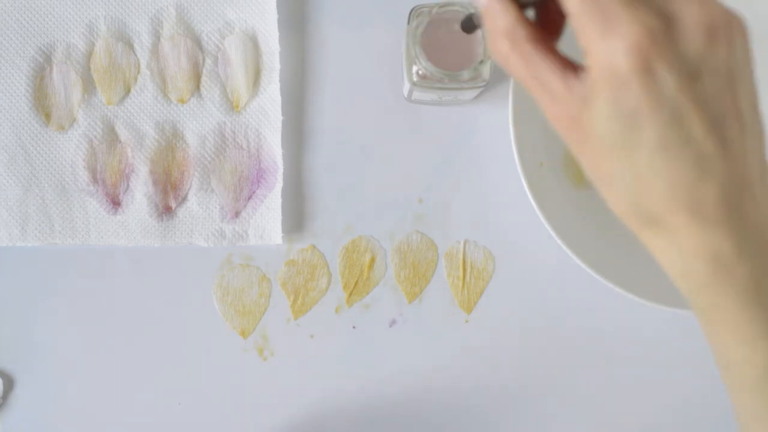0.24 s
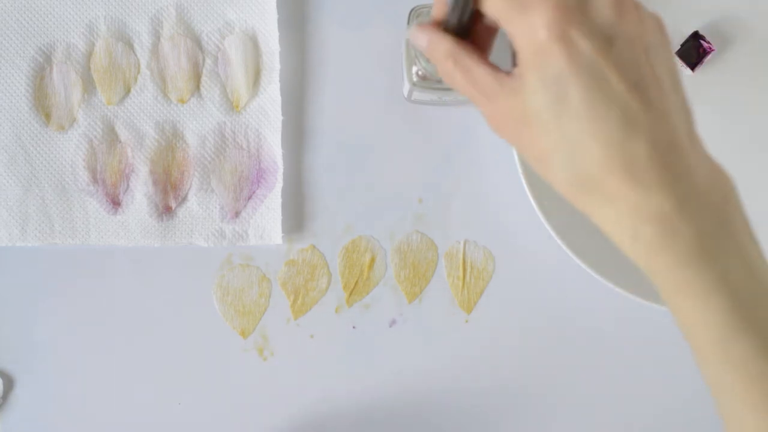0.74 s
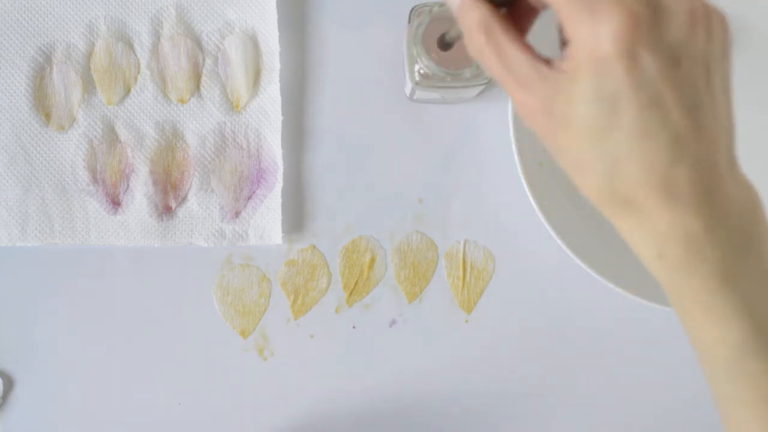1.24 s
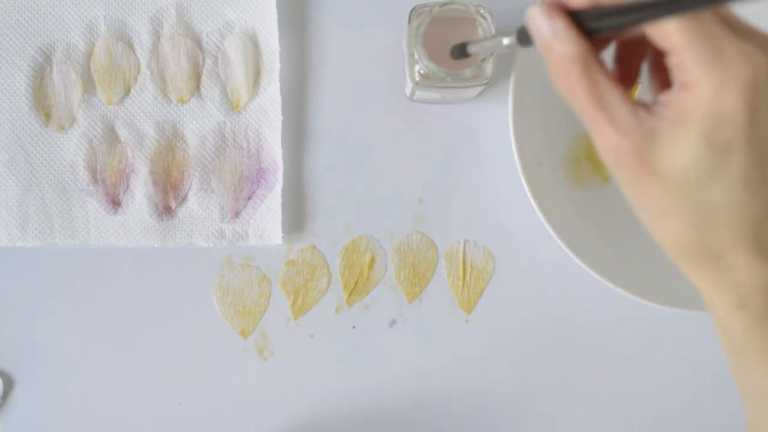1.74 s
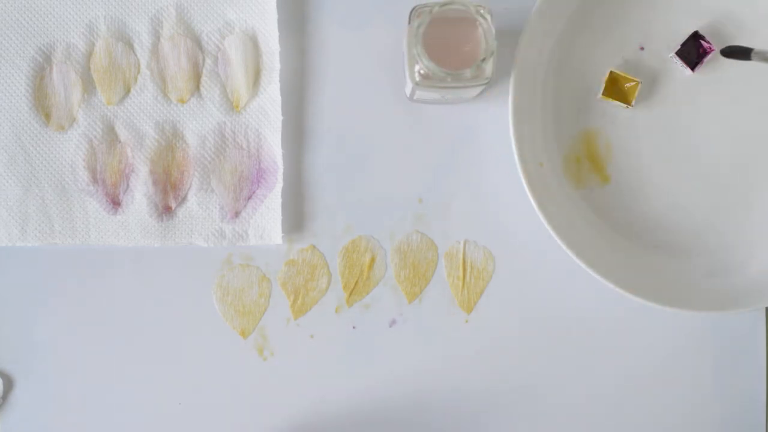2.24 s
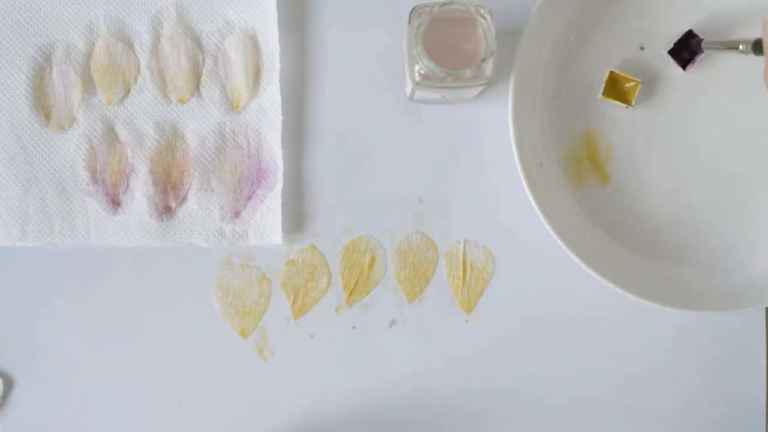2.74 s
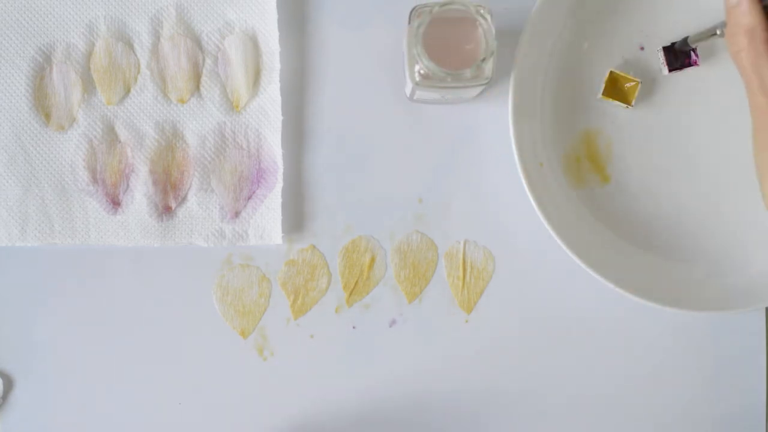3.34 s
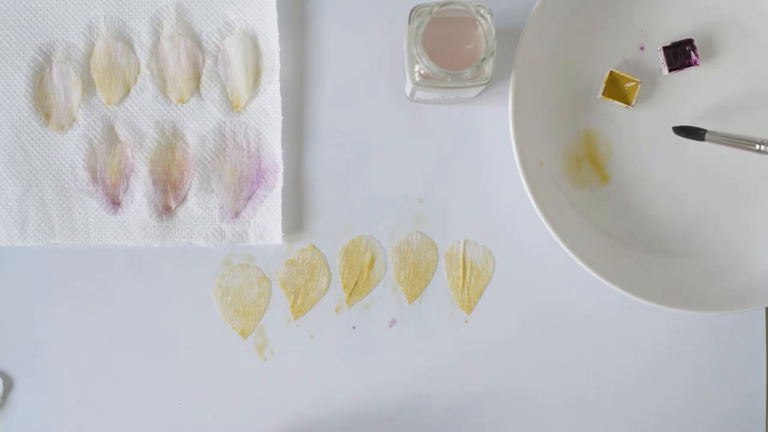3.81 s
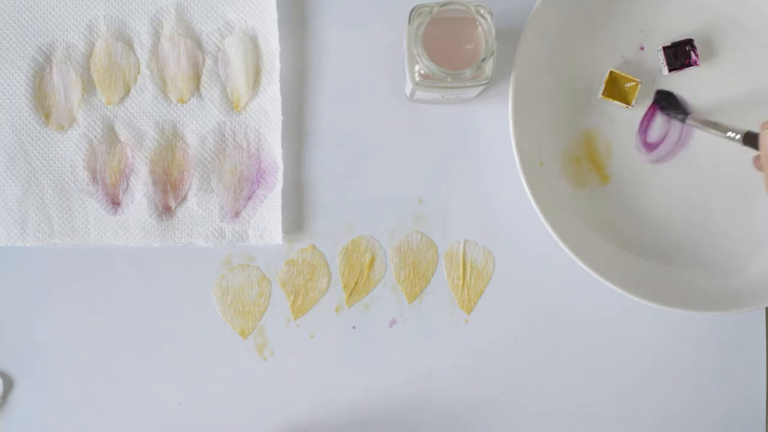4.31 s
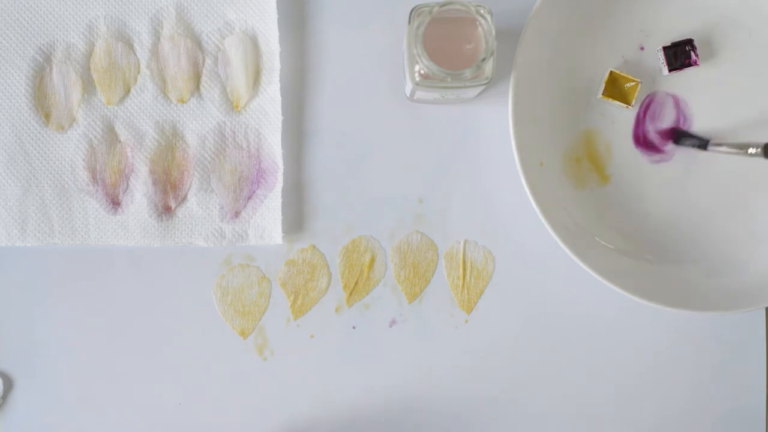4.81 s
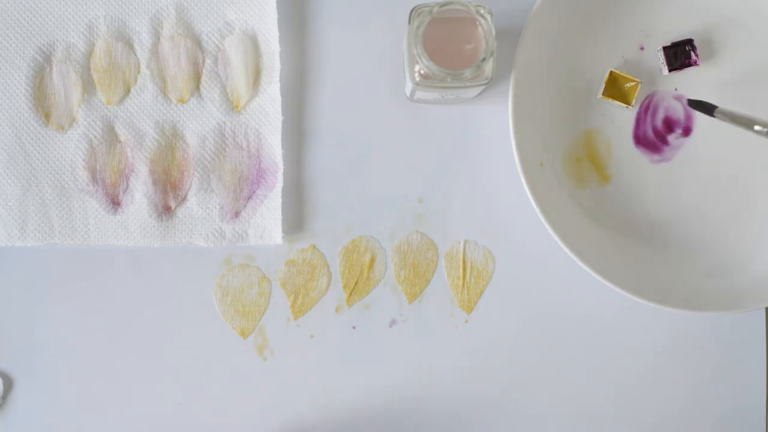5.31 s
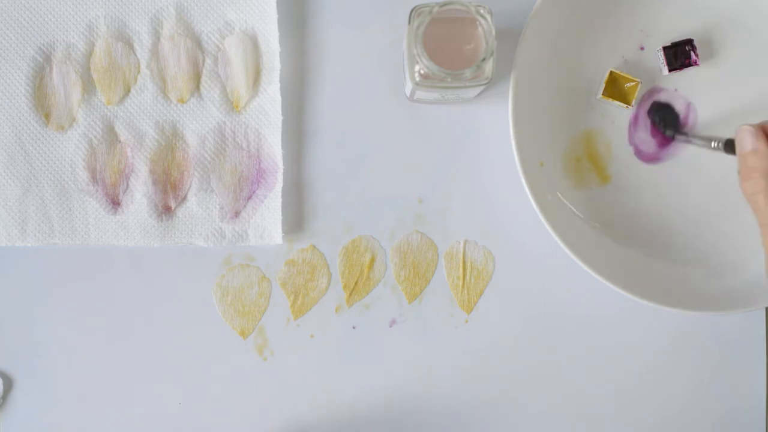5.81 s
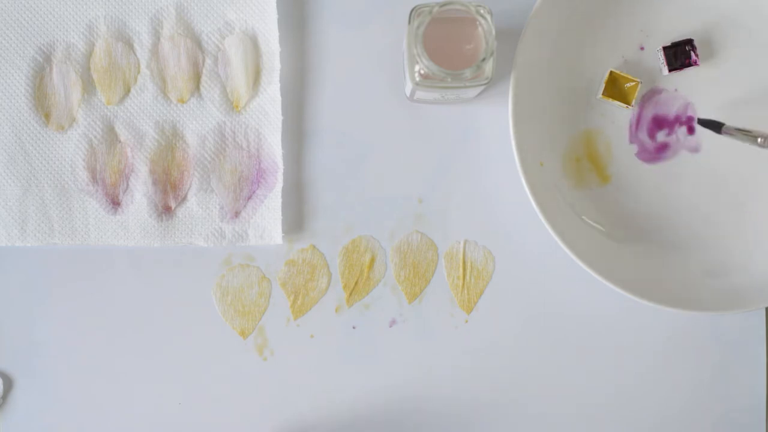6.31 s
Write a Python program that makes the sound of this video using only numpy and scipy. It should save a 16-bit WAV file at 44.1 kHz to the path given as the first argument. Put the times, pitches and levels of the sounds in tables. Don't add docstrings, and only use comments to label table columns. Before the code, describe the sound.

Glassy clinks, a wooden thud and a water plop, then sharp ceramic clatter and very faint rhythmic brush strokes over steady quiet hiss.

```python
import sys
import numpy as np
from scipy import signal
from scipy.fft import rfft, irfft, next_fast_len
from scipy.io import wavfile

SR = 44100
rng = np.random.default_rng(int(sys.argv[2]) if len(sys.argv) > 2 else 0)


def invert_db(level):
    return 10 ** (np.asarray(level, dtype=float) / 20)


def put_to_file(sound):
    columns = np.atleast_2d(sound).T
    safe = np.clip(columns, -1, 1)
    whole_steps = np.round(safe * 32767)
    wavfile.write(sys.argv[1], SR, whole_steps.astype(np.int16))


N = 288855

# [t/s, crack level/dB, ring over crack/dB, height struck/mm]
CLINKS = [(0, -37, -4, 43), (.1942, -50, 0, 35), (0.2843, -43, -8, 51), (.4895, -55, 10, 66),
          (0.6015, -12, -4.5, 25.6), (0.6984, -9, 2, 25), (0.8357, -3, -7, 34.5), (.8928, -16.5, -34.5, 15),
          (1.1952, -1.5, -3, 5), (1.2061, -12.5, -18, 8), (1.2124, -11, -2, 6.4), (1.2244, -21.5, -22, 5)]
BOWL_HZ = [735, 2210, 2276, 2918, 3846, 3900, 3962, 5157, 5882, 5930, 6013, 6395, 6530, 7208, 7390, 7865,
           8473, 8695, 8725, 9189, 10360, 11245, 11700, 12510, 12770, 13230, 13815, 14380, 15650]
# [level in its family/dB, t60/s]
BOWL_MODES = [(-40, 1.1), (-2, 0.22), (-6, 0.064), (-32, 0.13), (-4, .045), (-11, 0.16), (-13, 0.07),
              (-11.5, 0.043), (2, .07), (-5, 0.039), (-15, .1), (-4, 0.041), (-11.5, 0.035), (-12.5, 0.062),
              (-4, .07), (-12.5, 0.17), (-10.5, 0.14), (-3, 0.078), (-2.5, 0.14), (-16.5, 0.077), (-9, .09),
              (-2, 0.072), (-2.5, 0.06), (-5, 0.047), (-6, 0.072), (-8, 0.069), (-8, 0.035), (-26, 0.092),
              (-22.5, .07)]


def unit(x):
    return x / np.sqrt(np.mean(x ** 2) + 1e-30)


def along(points, hz):
    f, v = np.transpose(points)
    return np.interp(np.log(hz + 1), np.log(f + 1), v)


def filtered(x, response):
    m = next_fast_len(len(x) + 8192)
    return irfft(rfft(x, m) * response(np.fft.rfftfreq(m, 1 / SR)), m)[:len(x)]


def resonances(peaks):
    def response(f):
        total = 0
        for k, (hz, width_hz, db) in enumerate(peaks):
            damping = 1j * f * width_hz
            total = total + (-1) ** k * invert_db(db) * damping / (hz * hz - f * f + damping)
        return total
    return response


def add(track, start_s, sound):
    spot = track[max(round(start_s * SR), 0):][:len(sound)]
    spot += sound[:len(spot)]


def ring(modes, extra_db, attack_s, after_db, slower, flutter_db):
    t = np.arange(SR // 2) / SR
    hz, db, t60 = np.transpose(modes)[..., None]
    chance_db, chance_sign = rng.standard_normal((2, len(modes), 1))
    knots = rng.standard_normal((len(modes), 31))
    flutter = np.array([np.interp(t, np.arange(31) / 60, k) for k in knots])
    flutter = flutter * np.minimum(t / 0.03, 1)
    decay = invert_db(-60 * t / t60) + invert_db(after_db - 60 * t / (slower * t60))
    strength = np.sign(chance_sign) * invert_db(db + extra_db + chance_db + flutter_db * flutter)
    sines = strength * decay * np.sin(2 * np.pi * hz * t)
    return sines.sum(axis=0) * (1 - np.exp(-t / attack_s))


def crack(peaks, attack_s, t60_s, top_hz):
    t = np.arange(SR // 8) / SR
    burst = rng.standard_normal(len(t)) * invert_db(-60 * t / t60_s) * (1 - np.exp(-t / attack_s))
    body = resonances(peaks)
    burst = filtered(burst, lambda f: body(f) / (1 + 1j * f / top_hz) ** 2)
    return burst / np.abs(burst).max()


def blows(rows, families_hz, modes, peaks, follow, attack_s, t60_s, top_hz, **ringing):
    rings, cracks = np.zeros((2, N))
    for s, db, *family_db in rows:
        spot = list(zip(families_hz, family_db))
        tinted = [(hz, width, g + follow * along(spot, hz)) for hz, width, g in peaks]
        add(rings, s, invert_db(db) * ring(modes, along(spot, modes[:, :1]), attack_s, **ringing))
        add(cracks, s, invert_db(db) * crack(tinted, attack_s, t60_s, top_hz))
    return np.array([rings, cracks])


def jar():
    families_hz = [4600, 5550, 8085, 10000]
    jar_hz = [3000, 4549, 4678, 5335, 5539, 5640, 6550, 8085, 8390, 8580, 9100, 9925, 9965, 10060, 11300]
    # [level in its family/dB, t60/s]
    jar_modes = [(-20.5, 0.03), (2.5, 0.019), (-19, 0.05), (-22, 0.089), (-1.5, 0.11), (-13.5, 0.065),
                 (-20, .04), (-3, 0.15), (-5.5, .06), (0, .06), (-8.5, 0.048), (-9, 0.08), (-2.5, 0.074),
                 (-5.5, 0.093), (-7.5, 0.018)]
    # [f/Hz, width/Hz, level/dB]
    jar_crack = [(1783, 1000, -16), (3000, 440, -11), (4450, 490, -5), (5440, 350, -5), (6400, 470, -7.5),
                 (8500, 840, -9), (10000, 600, -9), (11330, 310, -9), (14600, 1300, -20)]
    heights_mm = [5, 25, 45]
    spots_db = [(1.5, -31.5, -29.5, -17.5), (-12.5, -1.4, -32, -7), (-11.5, -16, -6, -1)]
    rows = []
    for s, db, ring_db, mm in CLINKS:
        family_db = [ring_db + np.interp(mm, heights_mm, family) for family in np.transpose(spots_db)]
        rows.append((s, db, *family_db))
    return blows(rows, families_hz, np.column_stack([jar_hz, jar_modes]), jar_crack, follow=0.046,
                 attack_s=0.0012, t60_s=0.019, top_hz=14000, after_db=-17.5, slower=3.5, flutter_db=8.0)


def table():
    # [t/s, level/dB, edge rattle/dB, deepest mode/dB]
    thuds = [
        (0.605, -42, -9.5, 2.5),
        (.72, -36, -3, 9.5),
        (.836, -26.5, -11, -0.5),
        (0.8904, -8.5, -5.5, -4.5),
        (0.929, -22.5, 1.5, -9.5),
        (1.195, -24, -3, 3.5),
        (1.223, -22, -13, 6.5),
    ]
    table_hz = [139, 194, 244, 310, 385, 441, 540, 657]
    # [level/dB, t60/s]
    table_modes = [(-7, 0.37), (-3.5, 0.3), (-1, 0.12), (-1.5, 0.09), (-5.5, 0.11), (-6.5, 0.085),
                   (-17.5, 0.076), (-10, 0.089)]
    # [f/Hz, width/Hz, level/dB]
    table_edge = [(460, 900, -7), (813, 270, -2), (1150, 93, -9.5), (1400, 250, -3.5), (1966, 1100, -14)]
    booms, rattles = np.zeros((2, N))
    modes = np.column_stack([table_hz, table_modes])
    for s, db, edge_db, deep_db in thuds:
        deep = deep_db * (modes[:, :1] == table_hz[0])
        boom = ring(modes, deep, attack_s=0.0027, after_db=-25, slower=1.3, flutter_db=1.0)
        rattle = crack(table_edge, attack_s=0.00015, t60_s=0.059, top_hz=3000)
        add(booms, s, invert_db(db - 8) * boom)
        add(rattles, s, invert_db(db + edge_db) * rattle)
    return np.array([booms, rattles])


def plops():
    # [t/s, level/dB, f/Hz, swell/s, t60/s]
    pockets = [
        (0.8321, -2, 1357, .007, 0.0064),
        (0.917, -28, 1340, 0.0024, 0.027),
        (0.927, -15, 1317, 0.001447, 0.0074),
        (.955, -38.5, 2170, 0.0026, 0.017),
        (1.036, -50, 3670, .004, .04),
        (1.085, -49, 4280, 0.0034, 0.056),
        (1.213, -22, 1360, 0.0024, 0.013),
    ]
    out, t = np.zeros(N), np.arange(SR // 8) / SR
    for s, db, hz, swell_s, t60_s in pockets:
        swell = np.minimum(t / swell_s, 1) ** 0.8
        collapse = invert_db(-60 * np.maximum(t - swell_s, 0) / t60_s)
        add(out, s, invert_db(db) * swell * collapse * np.sin(2 * np.pi * hz * (t + t * t)))
    return out


def bowl():
    # [t/s, crack level/dB, ring over crack/dB, brightness/dB]
    clatter = [(2.6142, -21.5, -17, -7.5), (2.6532, -13, -19.5, -6), (2.6622, -23.5, -10, -7.5),
               (2.7036, -4.5, -18.5, 4.5), (2.712, 0, -14.5, 6.5), (2.82, -14, -19.5, -7),
               (2.83, -24.5, -9.5, -11), (2.874, -5.5, -15, 1), (2.8891, -7, -9.5, -1.6),
               (2.9215, -22, -21, -1), (3.1885, 0, -15, -4.5), (3.2215, -1.5, -20, 0),
               (3.292, -10.5, -14.5, -1), (3.3267, -5.5, -14.5, 2.5), (3.3624, 1.5, -13.5, 6)]
    families_hz = [2200, 5900, 8700, 12000]
    # [f/Hz, width/Hz, level/dB]
    bowl_crack = [(2160, 200, -8), (3800, 290, -7.5), (4910, 330, -11.5), (6480, 530, -1.5),
                  (7670, 550, -4), (8850, 340, -3.5), (10100, 1300, -12), (12010, 270, -14),
                  (13300, 2700, -15)]
    spot_db = [-6.5, -0.1, -4, -6]
    tilt = [-0.71, -0.052, .6, 1.5]
    rows = []
    for s, db, ring_db, bright_db in clatter:
        family_db = ring_db + np.array(spot_db) + bright_db * np.array(tilt)
        rows.append((s, db, *family_db))
    return blows(rows, families_hz, np.column_stack([BOWL_HZ, BOWL_MODES]), bowl_crack, follow=0.51,
                 attack_s=0.000077, t60_s=0.0056, top_hz=9000, after_db=-19.5, slower=1.5, flutter_db=4.5)


def ticks():
    # [t/s, peak level/dB, centre f/Hz]
    tick_rows = [(.1882, -37, 7000), (.1942, -41, 12500), (.2848, -34, 9000), (.292, -41, 11000),
                 (.4895, -32.5, 14000), (.724, -41.5, 14000), (.9185, -22.5, 10990), (1.117, -36.5, 1700),
                 (1.285, -41, 10000), (1.361, -31, 9000), (1.366, -42, 10000), (1.377, -33, 9500),
                 (1.545, -38.5, 3270), (1.5985, -39.5, 9500), (1.6212, -28.5, 6850), (1.622, -34.5, 1460),
                 (1.632, -40, 6940), (1.938, -42.5, 3000), (1.9545, -37.5, 9500), (2.012, -31, 3500),
                 (2.069, -31.5, 2690), (2.125, -45, 10000), (2.7125, -28, 604), (3.1888, -37, 704),
                 (3.3632, -28, 599), (3.812, -44, 3000), (3.908, -43, 7100), (4.3, -41.5, 9500)]
    # [centre f/Hz, width/centre]
    tick_width = [(600, 2.6), (1500, 0.5), (3000, 1.2), (7000, 1.2), (10000, 0.63), (14000, .25)]
    ferrule_s, ferrule_db, ferrule_hz = [0.6982, 0.8355, 0.8928], -12, 14200
    out = np.zeros(N)
    ferrule = []
    for s, db, *_ in CLINKS:
        if np.isclose(s, ferrule_s, rtol=0, atol=0.005).any():
            ferrule.append((s, db + ferrule_db, ferrule_hz))
    for s, db, hz in tick_rows + ferrule:
        peak = (hz, hz * along(tick_width, hz), 0)
        add(out, s, invert_db(db) * crack([peak], attack_s=0.0002, t60_s=0.006, top_hz=2.5 * hz))
    return out


def bristles():
    # [middle t/s, level/dB]
    strokes = [
        (3.991, -70),
        (4.197, -61),
        (4.392, -56),
        (4.586, -60),
        (4.789, -63),
        (4.99, -59.5),
        (5.175, -67.5),
        (5.457, -60),
        (5.665, -62),
        (5.856, -59),
    ]
    stroke_s, dry_db, wetting_db_per_s = 0.043, -2, -5.5
    lead_s = 0.08
    out, n = np.zeros(N), SR // 4
    t = np.arange(n) / SR - lead_s
    for s, db in strokes:
        bright_db = dry_db + wetting_db_per_s * (s - strokes[0][0])
        rub = rng.standard_normal(n) * np.exp(-(2.8 * t / stroke_s) ** 2)
        spot = [(2200, 6), (5500, -3), (7200, 1), (10400, bright_db + 9), (12000, bright_db - 14.0)]
        peaks = [(hz, 2.9 / t60, g * 0.27 + along(spot, hz)) for hz, (g, t60) in zip(BOWL_HZ, BOWL_MODES)]
        sing = filtered(rub, resonances(peaks))
        fizz = filtered(rub, resonances([(9500, 3200, 0)]))
        add(out, s - lead_s, invert_db(db) * np.sqrt(2 * stroke_s) * (unit(sing) + 0.9 * unit(fizz)))
    return out


def room(x):
    # [f/Hz, t60/s]
    room_t60 = [(150, 0.4), (1400, 0.38), (5000, 0.22), (10000, 0.29), (15000, 0.093)]
    out, step = np.zeros(N), SR // 10
    for start in range(0, N, step):
        hz, t, z = signal.stft(rng.standard_normal(SR // 2), SR, nperseg=256)
        decay = invert_db(-60 * t / along(room_t60, hz)[:, None])
        tail = signal.istft(z * decay, SR, nperseg=256)[1]
        tail = tail / np.linalg.norm(tail)
        add(out, start / SR + 0.004, signal.fftconvolve(x[start:start + step], tail))
    return out


def room_tone():
    # [f/Hz, level/(dB per Hz)]
    hiss_db = [(12, -37), (20, -5), (65, -2.5), (275, -6.5), (308, -2.5), (334, -9.5), (374, -7.5),
               (2170, -15.5), (3200, -17.5), (3790, -18), (4870, -20), (7190, -21), (15700, -25)]
    # [f/Hz, width/Hz, level/dB]
    drones = [(59.23, 8, -74), (309, 11, -71)]
    hiss_top_hz = 15850
    hiss = filtered(rng.standard_normal(N), lambda hz: invert_db(along(hiss_db, hz)) * (hz < hiss_top_hz))
    out = invert_db(-55.5) * unit(hiss)
    for hz, width_hz, db in drones:
        drone = filtered(rng.standard_normal(N), resonances([(hz, width_hz, 0)]))
        out = out + invert_db(db) * unit(drone)
    return out


def scene():
    rings, cracks = jar() + bowl() + table()
    cracks = cracks + ticks() + bristles()
    pops = plops()
    far = invert_db(-7) * cracks + invert_db(-11.5) * pops + invert_db(-13.0) * rings
    reflected = filtered(room(far), lambda hz: 1 / (1 + (hz / 13000) ** 2))
    return (rings + cracks + pops + reflected + room_tone())[None]


def low_pass(x):
    return signal.sosfilt(signal.butter(12, 16380, fs=SR, output="sos"), x)


def record(dry):
    mic_top_hz = 16000
    heard = filtered(dry[0], lambda hz: 1 / (1 + (hz / mic_top_hz) ** 90))[None]
    limited = heard / (1 + np.abs(heard) ** 8) ** (1 / 8)
    return low_pass(limited)


dry = scene()
out = record(dry)
put_to_file(out)
```